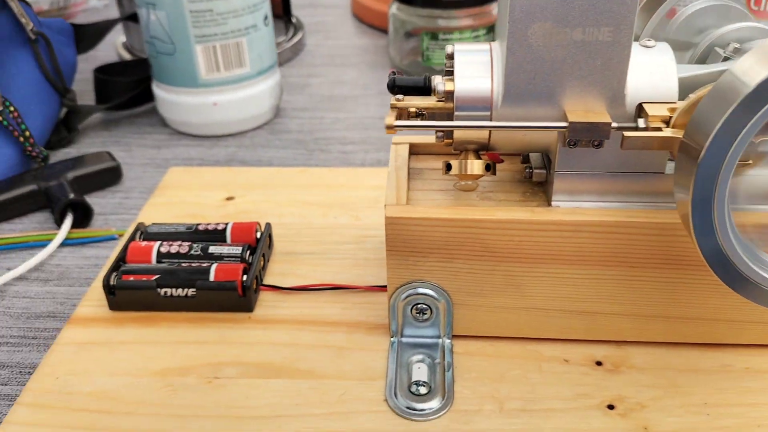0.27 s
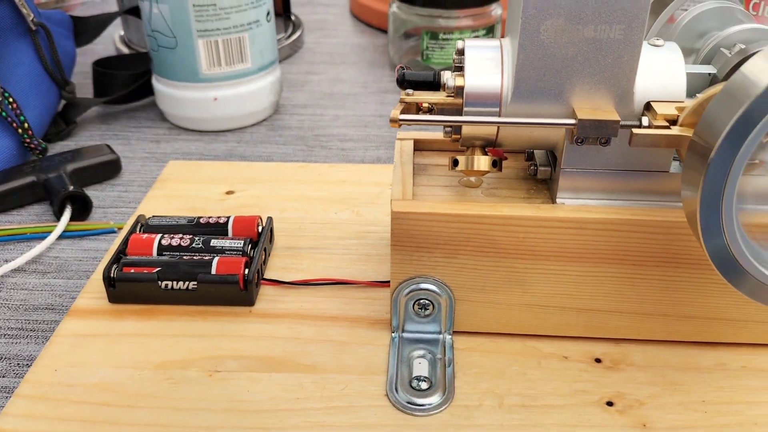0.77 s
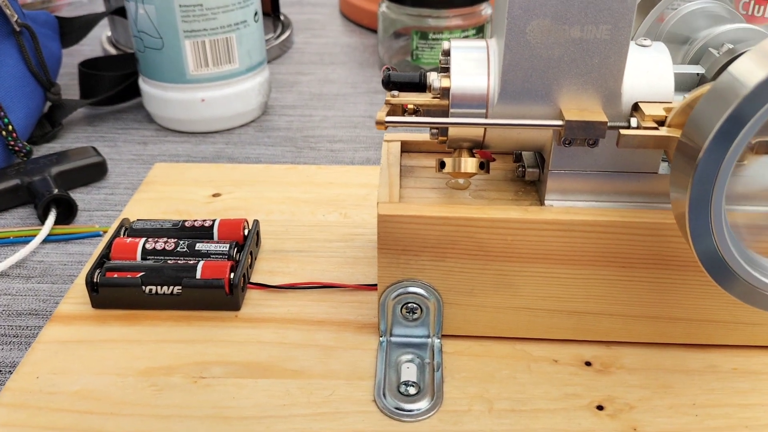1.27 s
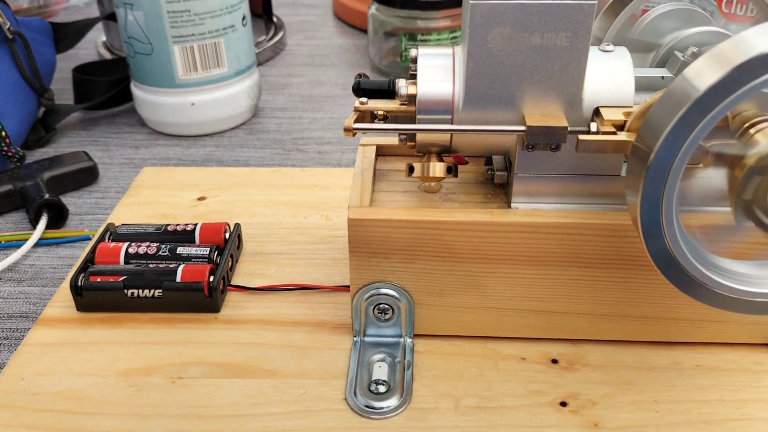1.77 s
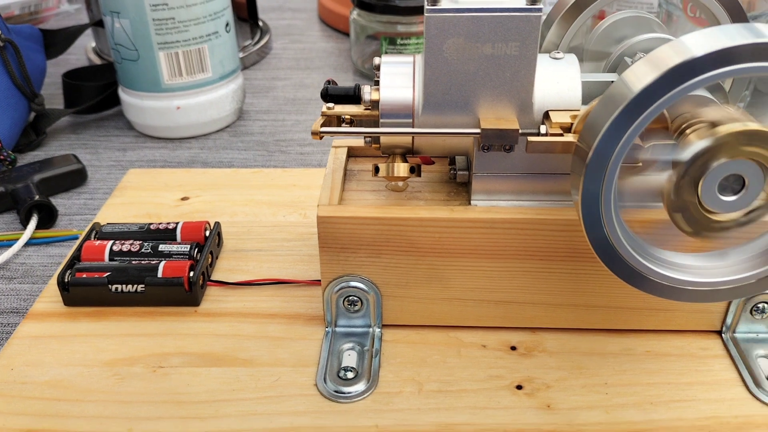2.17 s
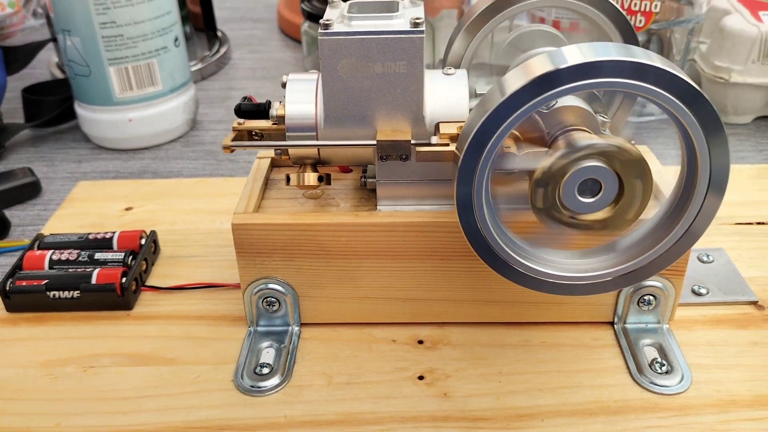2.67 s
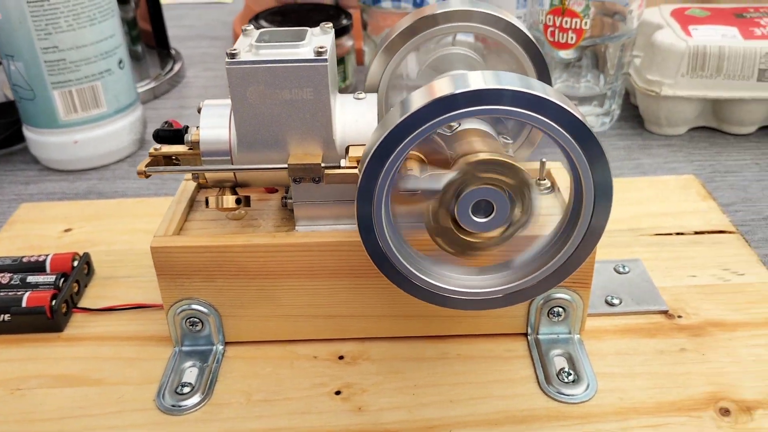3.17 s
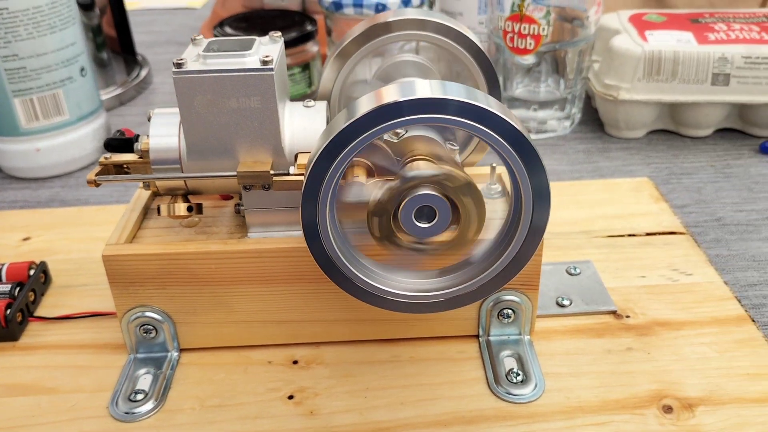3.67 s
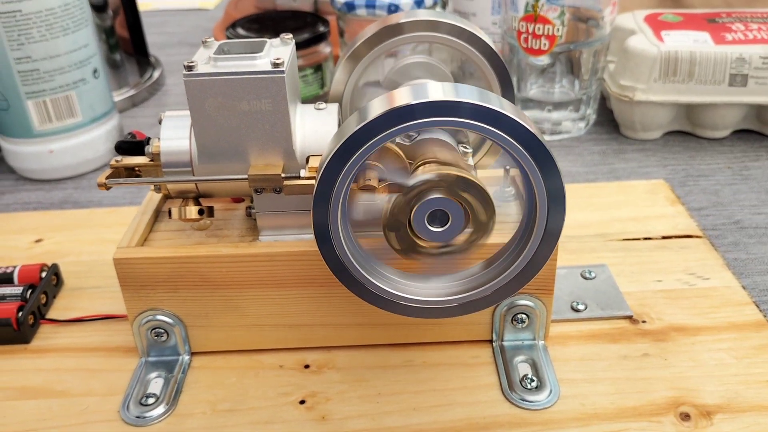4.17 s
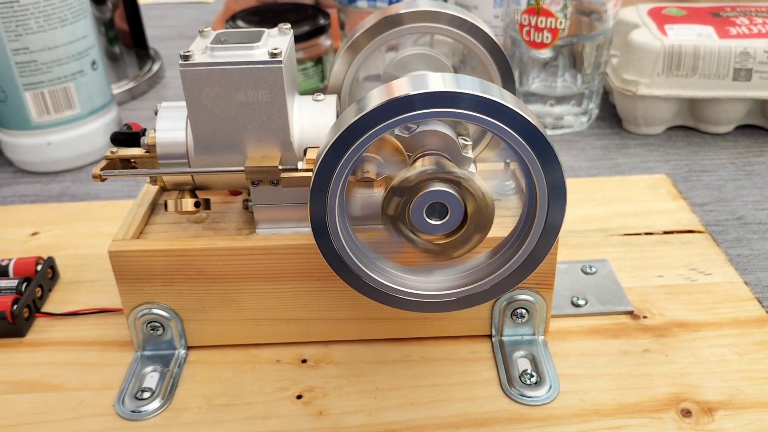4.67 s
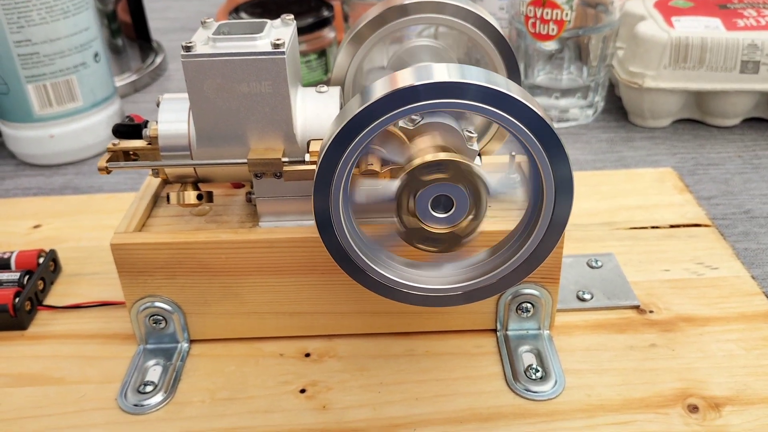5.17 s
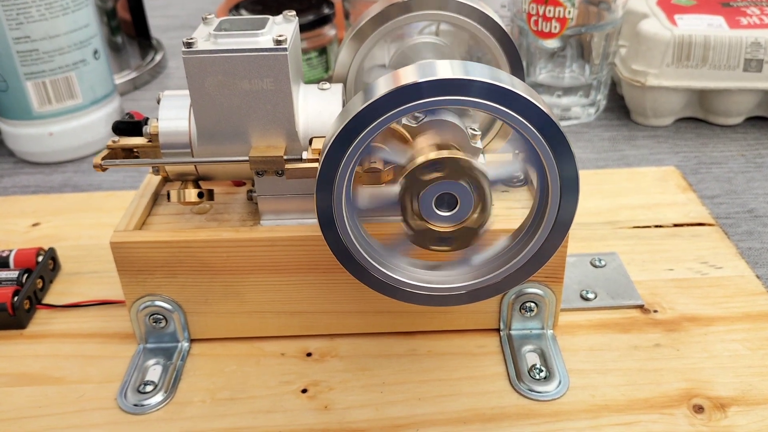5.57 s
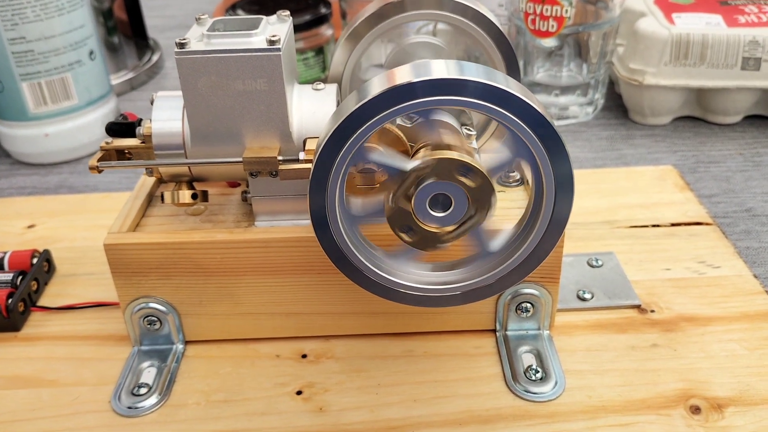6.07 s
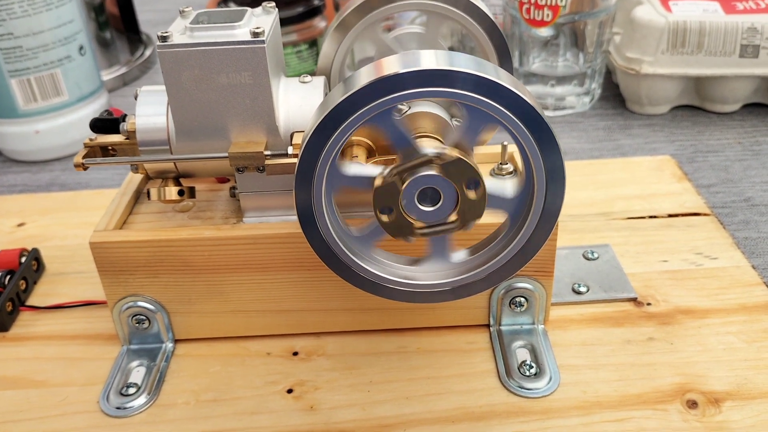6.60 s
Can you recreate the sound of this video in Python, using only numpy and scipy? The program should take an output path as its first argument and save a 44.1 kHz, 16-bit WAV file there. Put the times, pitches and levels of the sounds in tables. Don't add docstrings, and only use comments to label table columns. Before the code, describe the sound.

A small hit-and-miss engine on a wooden box runs close to the microphone indoors. Rapid woody ticks and metallic gear rattle repeat about fifteen times a second, broken by a dozen sharp, loud, unevenly spaced exhaust pops. Each pop momentarily pushes the clatter down in level before it swells back. After the last pop, bright double knocks slow down and the engine stops.

```python
import sys
import numpy as np
from scipy import signal
from scipy.io import wavfile

SR = 44100
rng = np.random.default_rng(int(sys.argv[2]) if len(sys.argv) > 2 else 0)


def waveform_to_disk(signal):
    frames = np.transpose(np.atleast_2d(signal))
    scaled = np.clip(frames, -1, 1) * 32767
    samples = np.round(scaled).astype(np.int16)
    wavfile.write(sys.argv[1], SR, samples)


def volts(x):
    e = np.asarray(x, float) / 20
    return 10 ** e


N = 301555

# start_s, crack_db, brightness_db, gain_duck_db, crack_lag_ms
POPS = [(0.159, -9.5, -0.5, 20.5, 1.6), (0.297, 5.5, -6, 16, 1.8), (0.953, -16.5, 8.5, 18, 1.5),
        (1.352, -13, 2.5, 19, 1.4), (1.947, -10, 1, 19.5, 1.1), (2.285, -2, -0.5, 20.5, 0.89),
        (2.691, -2, -4, 18, 1.1), (2.96, -1, -0.5, 14, 1.7), (3.548, -13, 9, 14, 3.1),
        (4.144, -4, -5, 21.5, 2.1), (4.28, 7.5, -2.2, 17.5, 1.7), (4.813, -6.5, 3.7, 11.5, 1.2)]
# trough_s, trough_db, rebound_db, pipe_ring_db
PRESSURE_SWINGS = [(0.1613, -5, -20, -14), (0.2974, -3, -11, -5), (0.954, -8.5, -21, -17.5),
                   (1.3524, -2.5, -18, -16), (1.9478, -13, -19, -19), (2.286, -16.5, -18, -13.5),
                   (2.6927, -14.5, -19.5, -11), (2.9615, -10, -16.5, -43), (3.551, -12.5, -19.5, -38),
                   (4.1452, -10, -23, -44), (4.285, -4.5, -29, -33), (4.816, -35, -20.5, -4)]
# start_s, box_db, rod_ring_db, partner_lag_ms, partner_relative_db
ROD_SLAPS = [(4.908, -21.5, -36, -24, -6), (4.978, -17, -19.5, -29, -10), (5.058, -14.5, -12.5, -4, -2.5),
             (5.133, -11.5, -10.5, 13.5, -23), (5.214, -11.5, -6.5, 6.5, -2), (5.299, -12.5, -8, 5.5, -4),
             (5.387, -12.5, -7.5, 6, -4.5), (5.479, -13, -7.5, 8, -2.5), (5.584, -13, -10.5, -8.5, -8.5),
             (5.686, -14, -8, -7, -4), (5.797, -10.5, -11, 11, -17), (5.916, -11.5, -10.5, -8.5, -5),
             (6.047, -12.5, -16, 15, -17), (6.194, -10.5, -13, -17, -40), (6.365, -13.5, -16.5, 13, -21),
             (6.579, -18, -16, -25, -26)]
# pitch_hz, width_hz, level_db
BOX_MODES = [(665, 600, -29), (814, 77, 0), (975, 190, 3), (1116, 168, 2.5), (1290, 530, -2),
             (1371, 300, 4.5), (1813, 300, -2.5), (2017, 260, -1.5), (2920, 920, -37)]
# pitch_hz, width_hz, level_db
METAL_MODES = [(3200, 250, -21), (4080, 400, 1), (5120, 890, 0), (5727, 190, -4.5), (6840, 770, -5),
               (8730, 410, -6.5)]
# pitch_hz, width_hz, level_db
PING_MODES = [(10560, 200, -14), (11840, 220, -24), (12200, 820, -4.5), (14100, 370, -6),
              (15300, 450, -3.5)]
# pitch_hz, width_hz, level_db
SPLASH_MODES = [(7840, 300, -8.5), (8870, 630, -5), (10500, 92, -20)]
# pitch_hz, width_hz, level_db
BOARD_MODES = [(111, 50, -16), (186, 47, -2.5), (267, 96, -3), (364, 320, -6.5)]


def in_time(rows):
    s, *columns = np.transpose(rows)
    return [np.interp(np.arange(N) / SR, s, column) for column in columns]


def contacts(s, db, length_s):
    marks, t = np.zeros(N), np.arange(1200) / SR
    at = np.round(np.asarray(s) * SR).astype(int)
    np.add.at(marks, at[at >= 0], volts(np.asarray(db))[at >= 0])
    touch = np.e * t / length_s * np.exp(-t / length_s)
    return signal.oaconvolve(marks, touch)[:N]


def resonance(x, hz, width_hz):
    r = np.exp(-np.pi * width_hz / SR)
    feed = np.sqrt((1 - r * r) / 2) * np.array([1, 0, -1])
    return signal.lfilter(feed, [1, -2 * r * np.cos(2 * np.pi * hz / SR), r * r], x + 1e-18)


def body(force, modes, low_hz, high_hz, grit_db=0.):
    rough = rng.standard_normal((2, N)) * volts(grit_db * np.minimum(rng.exponential(1, N), 5))
    rough /= rough.std()
    out = np.zeros(N)
    for k, (hz, width_hz, db) in enumerate(modes):
        out += volts(db) * resonance(force * rough[k % 2], hz, width_hz)
    edges = signal.butter(3, [low_hz, high_hz], "band", fs=SR, output="sos")
    return signal.sosfilt(edges, out) / np.sqrt(len(modes) / 2)


def tock(s, db, hz, swell_s):
    clicks, t = np.zeros(N), np.arange(900) / SR
    strength = volts(db) * rng.choice([-1, 1], len(s))
    clicks[np.round(s[s > 0] * SR).astype(int)] = strength[s > 0]
    swell = (t / swell_s * np.exp(1 - t / swell_s)) ** 0.95
    return signal.oaconvolve(clicks, swell * np.sin(2 * np.pi * hz * t))[:N]


def lumps(db, rate_hz):
    r = np.exp(-2 * np.pi * rate_hz / SR)
    slow = signal.lfilter([1], [1, -2 * r, r * r], rng.standard_normal(N))
    return volts(db * slow / slow.std())


def room(x):
    t = np.arange(6000) / SR
    tail = rng.standard_normal(len(t)) * volts(-60 * t / 0.16) * (t > .004)
    tail = signal.lfilter([.4], [1, -.6], tail)
    return signal.fftconvolve(x, tail / np.sqrt(np.sum(tail ** 2)))[:N]


def air_rumble():
    # pitch_hz, width_hz, level_db
    air_modes = [(28, 20, 8), (45, 25, -6)]
    return body(volts(-76), air_modes, 15, 70)


def rattle(turn_s):
    # time_s, turns_per_s
    speed = [(0, 16.8), (4.7, 14), (5, 12.4), (5.3, 11.3), (5.7, 8.8), (6.1, 6.9), (6.4, 5.1), (6.62, 4.1),
             (6.7, 2.4), (6.73, 0.47), (6.8, 1.24), (6.84, 1.8)]
    # time_s, nearness_db
    nearness = [(0, 1), (1, 1), (2.4, 0.5), (3.2, -0.8), (4.7, 0), (6.84, 0.6)]
    # full_speed_db, change_db per doubling of speed, nearness_share
    layers = [
        (-29, 7.5, 1.06),
        (-35, 9.5, -0.68),
        (-36.5, 4, -0.032),
        (-44.5, 11.5, 2.1),
    ]
    # turn_share, level_db
    slack = [(0, -2), (.2, -1), (.4, -6.5), (.58, -6), (.72, -6), (.9, -1), (1, -0.5)]
    # turn_share, level_db
    fizz_slack = [(0, 0.1), (.18, -0.5), (.28, -8), (.55, -13), (.64, -2.5), (.74, -10), (.95, -7),
                  (1, 0.1)]
    full_speed, rest_s, teeth_per_s = 15, 6.818, 350

    octaves = np.log2(np.maximum(in_time(speed)[0], .1) / full_speed)
    near_db = in_time(nearness)[0]
    box_db, metal_db, rumble_db, fizz_db = (
        db + per_db * octaves + share * near_db for db, per_db, share in layers)

    s = np.r_[turn_s, np.array(ROD_SLAPS)[:, 0], rest_s]
    angle = np.interp(np.arange(N) / SR, s, np.arange(len(s))) % 1
    slack_db = np.interp(angle, *np.transpose(slack))
    fizz_db = fizz_db + np.interp(angle, *np.transpose(fizz_slack))
    loaded = np.interp(np.arange(N) / SR, [4.8, 5.1], [1, .4])

    chatter = lumps(3.3, 82.0)
    teeth = (rng.random(N) < teeth_per_s / SR) * np.sqrt(SR / teeth_per_s)
    box_drive = volts(-2.5) * lumps(2.76, 105.0) + volts(-3) * teeth
    metal_drive = chatter + volts(-5.5) * teeth

    out = body(volts(box_db + loaded * slack_db) * box_drive, BOX_MODES, 564, 2900, grit_db=3.0)
    out += body(volts(metal_db + 0.77 * slack_db) * metal_drive, METAL_MODES, 2350, 8470, grit_db=5.5)
    out += body(volts(fizz_db) * chatter, PING_MODES, 7000, 15800, grit_db=-10.0)
    return out + body(volts(rumble_db), BOARD_MODES, 92, 670)


def intake():
    lead_s, hiss_db = 0.05, -38
    fire_s = np.array(PRESSURE_SWINGS)[:, 0]
    puffs = contacts(fire_s - lead_s, np.full(len(fire_s), hiss_db), 0.0055)
    return body(puffs, SPLASH_MODES + PING_MODES, 7000, 15500)


def turns():
    # first_turn_s, turn_length_ms
    runs = [(-0.034, 61.2), (0.2336, 63), (0.3616, 63.2), (1.0226, 65.5), (1.4182, 63.9), (2.0174, 67.1),
            (2.3545, 66.8), (2.7625, 67.9), (3.0265, 63.6), (3.6166, 63.6), (4.2193, 64), (4.3493, 64.7)]
    # knock_db, ping_db, intake_turn_main_knock_db
    run_levels = [(-14.5, -32, -6), (-14, -18, -18), (-12, -24.5, -34), (-14, -27, -9), (-14, -25.5, -14),
                  (-14, -27.5, -25), (-12.5, -31.5, -30), (-16, -26.5, -12), (-15, -28, -13),
                  (-14.5, -30.5, -19), (-14.5, -21, -17), (-15.5, -30.5, -39)]
    free_turn = (0, 0.1, -2.5, -10.5, -1.44)
    intake_turn = (-2.1, -6.5, -5.5, 0.5, -8.5)
    firing_turn = (-2.5, 2, -19, -4, -6.5)
    drag_ms_per_turn, shortest_turn_s = 0.7, 0.045
    spread_db = np.array([1.87, 2, 1.87, 1.87, 1.87])

    rows = []
    for (first, turn_ms), (knock_db, ping_db, intake_db), (fire, *_) in zip(
            runs, run_levels, PRESSURE_SWINGS):
        k = np.arange(12)
        s = first + (turn_ms * k + drag_ms_per_turn * k * (k - 1) / 2) / 1000
        s = s[s < fire - shortest_turn_s]
        base = np.array([knock_db, ping_db, knock_db, knock_db, knock_db])
        chance = rng.standard_normal((13, 5)) * spread_db
        missing = (intake_db - knock_db) * np.array([1, 0.96, 0, 0, 0])
        levels = [base + free_turn] * (len(s) - 1)
        levels += [base + intake_turn + missing, base + firing_turn]
        rows.append(np.column_stack([np.append(s, fire), levels + chance[:len(levels)]]))
    return np.vstack(rows)


def running(powered):
    s, main, ping, quarter, half, last = powered.T
    turn = np.append(np.diff(s), .072)

    knocks = contacts(s - .001, main - 2.5, 0.0012)
    knocks += contacts(s + 0.235 * turn, quarter - 2.5, 0.002)
    knocks += contacts(s + 0.492 * turn, half - 4, 0.0013)
    knocks += contacts(s + .725 * turn, last - 2.6, 0.0013)

    ticks = contacts(s, (main + ping) / 2 - 1.5, 0.00056)
    ticks += contacts(s + 0.15 * turn, quarter - 16, 0.0023)
    ticks += contacts(s + 0.626 * turn, last - 21, 0.0019)

    pings = contacts(s, ping - 0.1, 0.00085)
    pings += contacts(s + 0.13 * turn, ping - 11, 0.002)
    pings += contacts(s + 0.61 * turn, ping - 12, 0.0019)

    thumps = contacts(s - .002, main - 16, 0.0011)
    thumps += contacts(s + 0.387 * turn, half - 12, 0.005)
    splash = contacts(s, 2 * main - 12, 0.0025)

    rings = tock(s - .001, main - 2.1, 1165, 0.0011)
    rings += tock(s + 0.72 * turn, last - 1.5, 1100, 0.0015)
    rings += tock(s + 0.22 * turn, quarter - 1.5, 1162, 0.0016)
    rings += tock(s + .46 * turn, half - 1.5, 1050, 0.0015)
    rings += tock(s, main - 9, 2124, 0.0022)
    rings += tock(s + 0.72 * turn, last - 12, 1900, 0.0022)
    rings += tock(s, ping - 3, 12090, 0.00077)
    rings += tock(s, ping - 8, 14500, 0.00078)

    out = rings + volts(-4) * body(knocks, BOX_MODES, 583, 3100)
    out += body(ticks, METAL_MODES, 1700, 9500)
    out += body(splash, SPLASH_MODES, 7500, 10300)
    out += body(pings, PING_MODES, 7100, 13500)
    return out + body(thumps, BOARD_MODES, 85, 514)


def coasting_blows():
    # start_s, box_db, tick_db
    loose = [(4.871, -23, -35), (5.185, -20, -31), (5.271, -22, -29), (5.341, -23, -43), (5.534, -25, -33),
             (5.65, -23, -27), (5.726, -23, -50), (5.823, -22, -28), (5.851, -22.5, -28), (5.874, -22, -32),
             (5.967, -22, -50), (6.001, -20, -33), (6.033, -25, -39), (6.077, -19.5, -37),
             (6.427, -34, -38), (6.138, -20.5, -28), (6.256, -22, -31), (6.269, -22, -45),
             (6.297, -16, -28.5), (6.343, -33, -34), (6.437, -24, -33), (6.468, -28, -36),
             (6.493, -17.5, -31.5), (6.512, -31, -36), (6.639, -25.5, -52), (6.662, -29, -60),
             (6.682, -29, -42), (6.741, -37, -36), (6.817, -27, -35.5), (6.551, -37, -37)]
    s, box, rod, lag_ms, partner = np.transpose(ROD_SLAPS)
    tick = box - 5.5 - 6.5 * (s - 5)
    slaps = [s, box, rod, tick, box - 11.5]
    partners = [s + lag_ms / 1000, box + partner * 0.83, rod + partner, tick + partner,
                box + partner * 0.21 - 15]
    s, box, tick = np.transpose(loose)
    return np.hstack([slaps, partners, [s, box, box - 15, tick, box - 23]])


def coasting():
    # pitch_hz, swell_s, level_db
    slap_tones = [
        (1007, 0.0014, 3),
        (2016, .0012, 7),
        (182, 0.0055, -1.5),
    ]
    # pitch_hz, width_hz, level_db
    frame_modes = [(4130, 54, 2.5), (5720, 50, -5), (2120, 70, -6)]
    stop_s, stop_db = np.array([6.8165]), -21

    s, box, rod, tick, thump = coasting_blows()
    ticks = contacts(s, tick - 2.5, 0.00078)
    pings = contacts(s, tick - 11 - 6.4 * (s - 5), .0009)
    splash = contacts(s, rod + tick / 2 - 1.5 - 3.6 * (s - 5), 0.0013)

    out = body(contacts(s, box - 11, 0.0023), BOX_MODES, 710, 2640)
    out += volts(-2.0) * body(ticks, METAL_MODES[:5], 2600, 8800)
    out += volts(-7) * body(ticks, frame_modes, 1500, 7300)
    out += body(pings, PING_MODES, 8900, 14000)
    out += body(splash, SPLASH_MODES, 7760, 9400)
    for level, (hz, swell_s, db) in zip((box, rod, thump), slap_tones):
        out += tock(s - .0012 + 0.63 * swell_s, level + db - 5.0, hz, swell_s)
    out += body(contacts(s + 0.00083, thump - 5, 0.0028), BOARD_MODES, 124, 480)
    out += tock(stop_s, stop_db, 1060, 0.0022)
    return out + tock(stop_s, stop_db - 7, 2040, 0.0018)


def snaps():
    # start_s, peak_db, pipe_pitch_hz
    shocks = [(0.159, -16, 3700), (0.2972, 3.5, 2700), (0.953, -5, 2610), (1.3516, -3.5, 2730),
              (1.947, -10, 1480), (2.2845, -1, 2360), (2.6908, -8, 1500), (2.9622, -8, 4080),
              (3.5514, -2.5, 2940), (4.144, -4, 3970), (4.2822, -3, 2630), (4.814, -6, 1590)]
    return sum(tock(np.array([s]), db - 3, hz, 0.0007) for s, db, hz in shocks)


def exhaust():
    # pitch_hz, width_hz, level_db
    pipe_modes = [(990, 1300, 2), (1590, 70, -1), (2560, 200, -6), (3700, 1330, 1.5), (5600, 610, -20),
                  (7500, 1300, -49)]
    out, t = np.zeros(N), np.arange(-100, 400) / SR
    trough = (0.69 * (t / 0.00067) ** 2 - 1) * np.exp(-(t / 0.00094) ** 2)
    rebound = np.sin(2 * np.pi * np.clip((t - .0003) / 0.00758, 0, 1)) * np.exp(t / 0.0052)
    ring = np.cos(2 * np.pi * 620 * t) * np.exp(-(t / 0.0013) ** 2)
    for s, trough_db, rebound_db, ring_db in PRESSURE_SWINGS:
        at = round(s * SR) - 100
        swing = volts(trough_db) * trough + volts(rebound_db - 5.5) * rebound - volts(ring_db) * ring
        out[at:at + len(t)] += swing

    s, crack_db, bright_db, duck_db, lag_ms = np.transpose(POPS)
    lever = contacts(s - .007, -18.0 - duck_db / 9, 0.00044)
    dull = contacts(s, crack_db - 9, 0.00086)
    bright = contacts(s + lag_ms / 1000 - .001, crack_db - 2.5 + bright_db, 0.0011)
    out += body(lever, METAL_MODES[3:5], 5700, 7000)
    out += body(dull, pipe_modes[:2], 820, 3200)
    return out + body(bright, pipe_modes[2:], 1650, 6300)


def scene():
    powered = turns()
    engine = rattle(powered[:, 0]) + running(powered) + coasting()
    engine_in_room = engine + volts(-18) * room(engine)
    return (air_rumble() + intake() + engine_in_room + snaps() + exhaust())[None]


def ducking():
    delay_s, recovery_s = 0.0059, 0.21
    t, db = np.arange(N) / SR, np.zeros(N)
    for s, *_, duck_db, lag_ms in POPS:
        since = t - s - delay_s
        db = np.minimum(db, -duck_db * np.exp(-np.maximum(since, 0) / recovery_s) * (since > 0))
    return volts(signal.lfilter([.02], [1, -.98], db))


def roll_off(x):
    return signal.sosfilt(signal.butter(12, 16500, fs=SR, output="sos"), x)


def record(dry):
    x, gain = dry + volts(-83) * rng.standard_normal(N), ducking()
    treble_split = signal.butter(4, 5770, "high", fs=SR, output="sos")
    treble = signal.sosfiltfilt(treble_split, x)
    x = (x - treble) * gain + treble * gain ** 0.76
    x = 1.003 * np.tanh(x / 1.202)
    x = signal.sosfilt(signal.butter(2, 40, "high", fs=SR, output="sos"), x)
    x = signal.sosfilt(signal.cheby2(10, 50, 16550, fs=SR, output="sos"), x)
    return roll_off(x)


dry = scene()
out = record(dry)
waveform_to_disk(out)
```